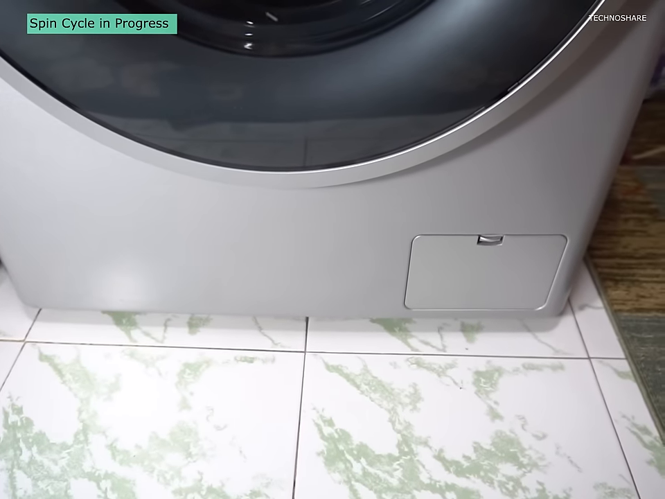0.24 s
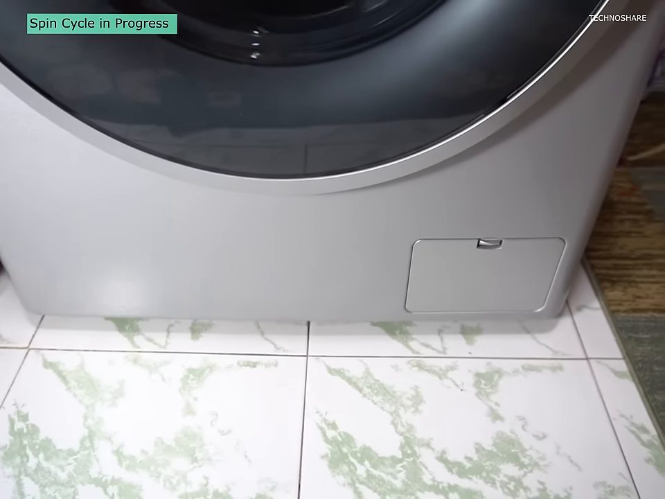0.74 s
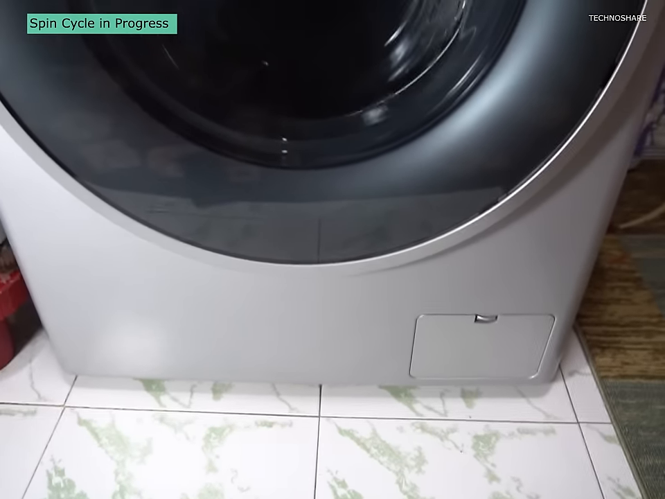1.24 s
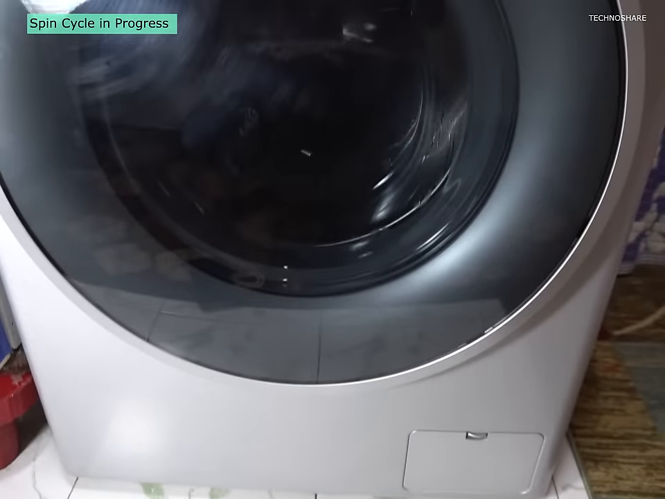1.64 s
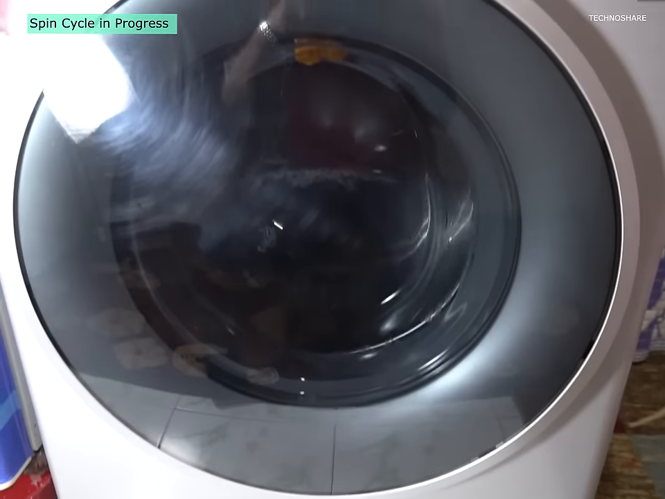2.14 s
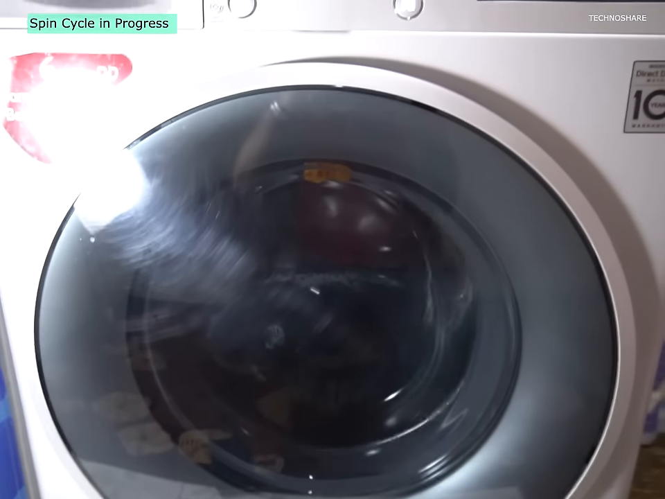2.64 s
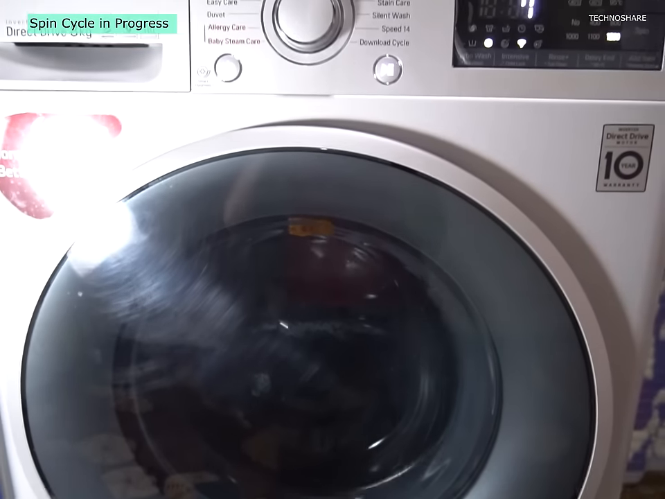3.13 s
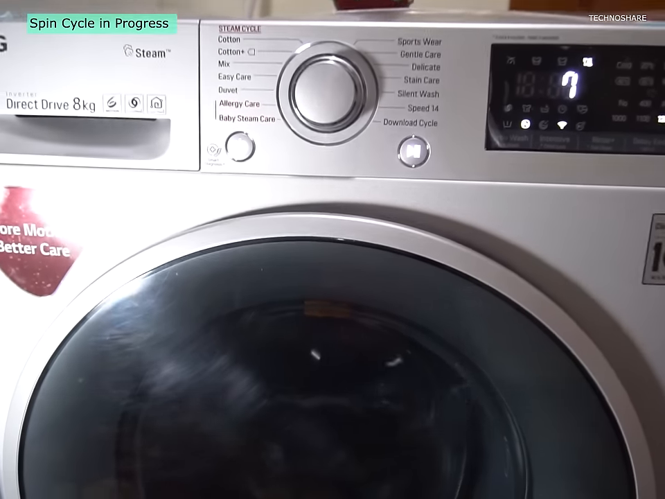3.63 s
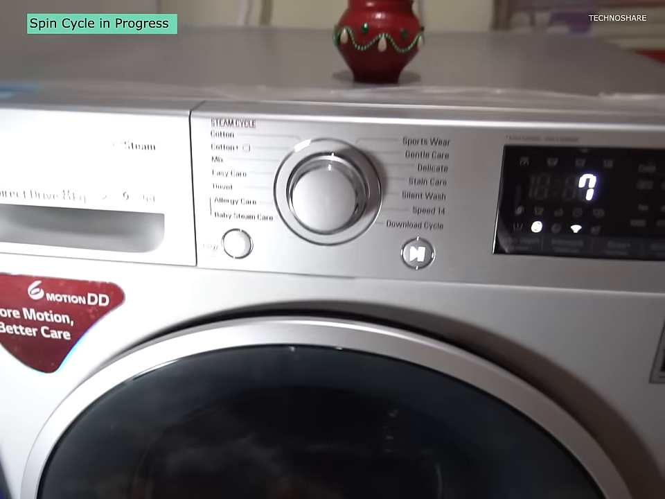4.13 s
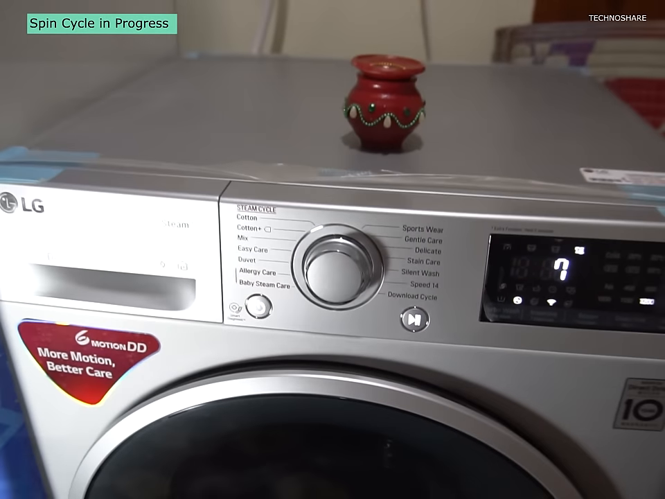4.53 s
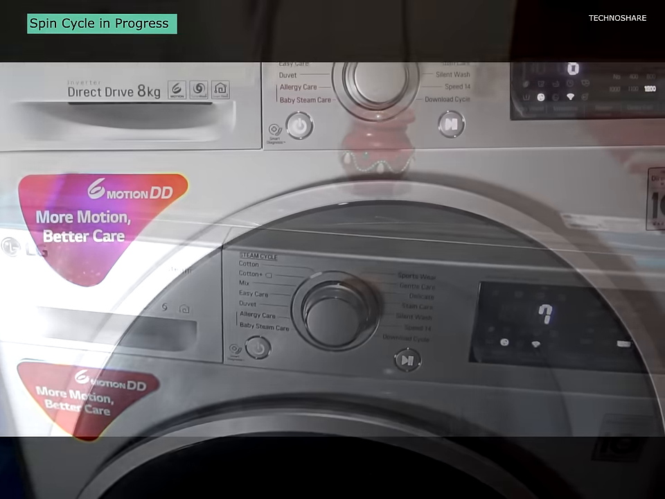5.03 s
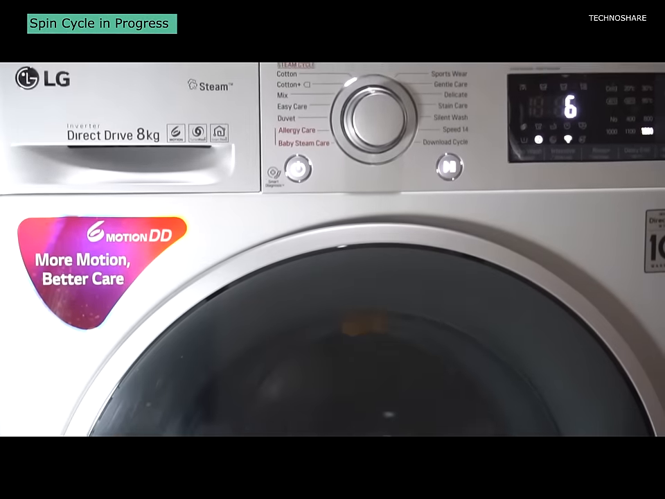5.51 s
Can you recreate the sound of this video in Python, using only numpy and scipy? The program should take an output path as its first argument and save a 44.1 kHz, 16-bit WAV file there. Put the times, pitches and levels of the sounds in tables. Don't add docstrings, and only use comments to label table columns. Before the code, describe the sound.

Steady fluttering drone of a washing machine on spin, with small handling clicks, fading across into a heavier, faster pounding close to the drum.

```python
import sys
import numpy as np
from scipy import signal
from scipy.fft import rfft, irfft
from scipy.io import wavfile
from scipy.ndimage import uniform_filter1d

SR = 44100
rng = np.random.default_rng(int(sys.argv[2]) if len(sys.argv) > 2 else 0)


def bounce(signal):
    frames = np.transpose(np.atleast_2d(signal))
    limited = np.clip(frames, -1, 1)
    pcm = np.round(limited * 32767).astype(np.int16)
    wavfile.write(sys.argv[1], SR, pcm)


def boost_factor(decibels):
    exponent = np.asarray(decibels, float) / 20
    return 10 ** exponent


N = 254456
TIME = np.arange(N) / SR

RISE_S = [.9, 2.3, 3.7]
# order of drum speed, then level/dB rms at floor, door, lid
SLOW_ORDERS = [(1, -33, -37, -37), (2, -35, -36, -36), (3, -26, -25, -23), (4, -48, -54, -53),
               (5, -32, -33, -34), (6, -41, -40, -41), (7, -46, -46, -49), (8, -50, -50, -56),
               (9, -40, -44, -47), (10, -50, -50, -55), (11, -48, -49, -55), (12, -53, -56, -54),
               (14, -48, -50, -53), (15, -57, -52, -57), (17, -57, -61, -54), (18, -65, -60, -60),
               (19, -67, -61, -62), (20, -65, -59, -61), (22, -59, -59, -58), (23, -56, -64, -68),
               (24, -60, -59, -62), (29, -70, -59, -62), (30, -56, -57, -64), (32, -65, -60, -64),
               (36, -55, -65, -67), (37, -58, -59, -65), (42, -60, -61, -72)]
# order, then level/dB rms at floor, door, lid
SLOW_SINGING = [(68, -69, -73, -68), (72, -76, -80, -82), (144, -75, -80, -76)]
# order, then level/dB rms at floor, door, lid
PANELS = [(21, -54, -47.5, -44.5), (27, -45.5, -50.5, -58)]
# t/s, order
DIPS = [
    (.56, 27),
    (1.65, 27),
    (3.55, 27),
    (2.47, 21),
    (2.95, 21),
    (3.23, 21),
    (3.55, 21),
    (3.8, 21),
    (4.03, 21),
]
# order, level/dB rms
FAST_ORDERS = [(1, -16), (2, -17), (3, -27), (4, -34), (5, -30), (6, -44), (7, -39), (8, -49), (9, -39),
               (10, -48), (11, -40), (12, -55), (13, -47), (14, -54), (17, -51), (18, -53), (21, -49),
               (22, -48), (23, -50), (24, -37), (25, -54), (27, -51), (29, -53), (37, -55), (38, -54),
               (39, -53), (42, -55), (96, -60),
               (33, -52.5), (34, -57), (36, -54), (43, -59), (52, -59), (108, -68)]
# start t/s, end t/s, level/dB rms
SLOTS = [
    (.1, 1.77, -77.5),
    (1.9, 3.25, -69.5),
    (3.85, 5.6, -67.5),
]
# f/Hz, level/dB per Hz
SLOW_ROAR = [(10, -78), (30, -71), (75, -72), (140, -73), (260, -71), (450, -75), (700, -83), (1100, -87),
             (1700, -94.5), (2600, -101), (4500, -107), (8000, -105), (12200, -111), (14400, -106),
             (15600, -111)]
# f/Hz, level/dB per Hz
FAST_ROAR = [(10, -76), (30, -66), (140, -65), (220, -68), (350, -67.5), (500, -72.5), (1100, -81),
             (1700, -86), (2600, -92), (4000, -99), (5500, -102.5), (9500, -103.5), (11800, -113),
             (15500, -120)]
# f/Hz, level/dB
TICK_TONE = [(3500, -24), (5500, -3), (7500, -0.5), (10300, 6), (12000, -9), (13500, 0), (15700, -2.5)]
TICK_DB = (-54.5, -55.5, -57.5)
# f/Hz, level/dB rms, wobble a turn/Hz
WHINE = [(14204, -72.5, 8), (14632, -75, 8), (15052, -90, 8)]
# f/Hz, level/dB rms, wobble a turn/Hz
FAST_WHINE = [(13991, -86, 8), (13947, -100, 8), (14566, -99.5, 8), (14633, -96.5, 8)]
# t/s, peak level/dB, f/Hz, width/Hz, t60/s
CLICKS = [
    (0.0273, -35, 5000, 7000, 0.0039),
    (0.599, -48, 1340, 300, 0.13),
    (2.0113, -42.5, 3200, 3500, 0.0085),
    (3.559, -43, 9500, 4000, .012),
    (3.562, -56, 8000, 6000, 0.14),
    (3.578, -56, 9000, 3000, .03),
    (3.613, -56, 7500, 6000, 0.11),
    (4.5384, -40, 2900, 1900, .005),
    (4.541, -48, 3200, 2000, 0.022),
]
# t/s, length/s, f/Hz, glide/Hz, level/dB rms
BIRD = [
    (4.6, .07, 5180, 80, -78),
    (4.72, .12, 5720, -30, -79),
    (4.73, .13, 6750, -20, -73),
]
# f/Hz, correlation/1
SAME = [(60, 0.91), (700, 1), (1400, 0.94), (2100, 0.73), (2800, 0.1), (4000, 0.073), (5500, 0.42),
        (9000, 0.037), (15000, .1)]
# f/Hz, left-right level/dB
LEAN = [(60, -1.6), (200, -1), (700, -.5), (4400, -.2), (8120, 1.8), (15000, 3)]
# f/Hz, left-right level/dB
FAST_LEAN = [(60, -1.9), (200, -1), (700, -.5), (2400, -.3), (8120, -1.3), (15000, -1)]


def shake(turns, orders, levels_db, lead, spread, unsteady_db):
    out = np.zeros(N)
    for order, db in zip(orders, levels_db):
        loose = np.clip((order - 6) / 18, 0, 1)
        slip = 0.06 * loose * np.sqrt(order / 24) * wander(3)
        level_db = db + unsteady_db * loose * wander(4)
        out += boost_factor(level_db) * tone(order * turns + lead + spread * order ** 2 + slip)
    return out


def panel_shake(turns):
    dip_s, dip_db = 0.042, -13
    levels = []
    for order, *levels_db in PANELS:
        dips = sum(dip_db * np.exp(-((TIME - s) / dip_s) ** 2) for s, k in DIPS if k == order)
        levels.append(height(levels_db) + dips)
    return shake(turns, [row[0] for row in PANELS], levels, lead=0, spread=0, unsteady_db=0.7)


def fast_thump(turns):
    orders, levels = np.transpose(FAST_ORDERS)
    flipped = ((orders >= 8) & (orders <= 12)) | ((orders >= 16) & (orders <= 22))
    out = np.zeros(N)
    for part, flip_turns in ((~flipped, 0), (flipped, 0.48)):
        out += shake(turns + 0.358, np.round(orders[part]), levels[part],
                     lead=0.275 + flip_turns, spread=0.0015, unsteady_db=0.5)
    return out


def mains_hum():
    mains_hz = 50.121
    hum = boost_factor(height((-35, -36, -36))) * tone(mains_hz * TIME + 0.135)
    buzz = boost_factor(height((-40.5, -42.5, -46.5))) * tone(2 * mains_hz * TIME + 0.4)
    return hum + buzz


def drain_pump():
    return boost_factor(-48 + 2.5 * wander(2)) * tone(24.8 * TIME + 0.15 * wander(4))


def roar(spectrum, drift, patchy_db):
    frames, hz = N // 512 + 5, np.fft.rfftfreq(2048, 1 / SR)
    a, b, c, d, patches = rng.standard_normal((frames, 1025, 5)).T
    patches = uniform_filter1d(patches, size=8, axis=0)
    patches = evened(uniform_filter1d(patches, size=8, axis=1))
    same = np.clip(read(SAME, hz), -1, 1)[:, None]
    left = a + 1j * b
    right = same * left + np.sqrt(1 - same ** 2) * (c + 1j * d)
    frame_s = np.arange(frames) * 512 / SR
    middle = ((hz >= 300) & (hz < 4500))[:, None]
    treble = (hz >= 4500)[:, None]
    level_db = read(spectrum, hz)[:, None] + patchy_db * patches
    level_db = level_db + middle * drift * height((0, -1, 0), frame_s)
    level_db = level_db + treble * drift * height((-2.5, -3, -1), frame_s)
    z = np.array([left, right]) * boost_factor(level_db)
    return boost_factor(19.5) * signal.istft(z, nperseg=2048, noverlap=1536)[1][:, :N]


def ticks(turns):
    lap = np.floor(turns).astype(int) + 1
    uneven_db = 1.1 * rng.standard_normal(200)[lap]
    since = (turns % 1) / 17.7
    shape = np.exp(-since / 0.00041) + 0.39 * np.exp(-since / 0.0066) + 0.54 * np.exp(-since / 0.026)
    shared, left, right = rng.standard_normal((3, N))
    noise = 0.44 * shared + 1.1 * np.array([left, right])
    burst = evened(coloured(noise, lambda hz: read(TICK_TONE, hz)))
    return boost_factor(height(TICK_DB) + uneven_db) * shape * burst


def whine(lines, turns, jitter_hz):
    out = np.zeros((2, N))
    for hz, db, wobble_hz in lines:
        bend_hz = wobble_hz * (tone(turns) + 1.5 * tone(2 * turns + 0.2))
        beat = np.cumsum(hz + bend_hz + jitter_hz * wander(25)) / SR
        for port, offset in zip(out, (-0.1, 0.1)):
            flutter_db = 3.2 * wander(28) + 2.8 * tone(turns + rng.random())
            port += boost_factor(db + flutter_db) * tone(beat + offset + 0.13 * wander(8))
    return out


def slot_whistle(turns):
    edge_s = 0.2
    level = boost_factor(-80)
    for start, end, db in SLOTS:
        inside = np.minimum(TIME - start, end - TIME) / edge_s + 0.5
        level = level + boost_factor(db) * np.clip(inside, 0, 1)
    return level * boost_factor(1.5 * wander(10)) * tone(120 * turns + 0.08 * wander(18))


def bearing_squeak():
    level_db = np.interp(TIME, [0, 1.8, 2.1], [-85, -83, -100]) + 4 * wander(5)
    return boost_factor(level_db) * tone(4120 * TIME + 0.5 * wander(20))


def clicks():
    out, t = np.zeros((2, N)), np.arange(8192) / SR
    for s, db, hz, width_hz, t60 in CLICKS:
        shared, left, right = rng.standard_normal((3, len(t)))
        noise = shared + 0.6 * np.array([left, right])
        band = coloured(noise, lambda f: -28 * np.log10(1 + ((f - hz) / (width_hz / 2)) ** 2))
        decay = boost_factor(db - 2.5 - 60 * t / t60) * np.minimum(t / 0.00022, 1)
        out[:, round(s * SR):][:, :len(t)] += decay * evened(band)
    return out


def bird():
    out = np.zeros(N)
    for s, length, hz, glide_hz, db in BIRD:
        u = np.clip((TIME - s) / length, 0, 1)
        out += boost_factor(db) * np.sin(np.pi * u) ** 0.5 * tone(np.cumsum(hz + glide_hz * u) / SR)
    return out


def height(levels_db, t=TIME):
    return np.interp(t, RISE_S, levels_db)


def ports(x, lean, left_lead_s):
    hz = np.fft.rfftfreq(N, 1 / SR)
    half = boost_factor(read(lean, hz) / 2) * np.exp(1j * np.pi * hz * left_lead_s)
    return irfft(rfft(x * np.ones((2, 1))) * np.array([half, 1 / half]), N)


def tone(turns):
    return np.sqrt(2) * np.cos(2 * np.pi * turns)


def wander(rate_hz):
    coarse = TIME[::128]
    knots = np.interp(coarse * min(rate_hz, 30) * 2, np.arange(400), rng.standard_normal(400))
    return np.interp(TIME, coarse, evened(uniform_filter1d(knots, size=15)))


def coloured(x, db_at):
    hz = np.fft.rfftfreq(x.shape[-1], 1 / SR)
    return irfft(rfft(x) * boost_factor(db_at(hz)), x.shape[-1])


def evened(x):
    return x / np.sqrt(np.mean(x ** 2) + 1e-20)


def read(points, hz):
    f, value = np.transpose(points)
    return np.interp(np.log(hz + 1), np.log(f + 1), value)


def slow_view():
    drum_hz = 17.52696 + 0.070706 * TIME - 0.000712 * TIME ** 2 - 0.0003786 * TIME ** 3
    turns = np.cumsum(drum_hz) / SR
    rows = SLOW_ORDERS + SLOW_SINGING
    levels = [height(row[1:]) for row in rows]
    body = shake(turns + 0.225, [row[0] for row in rows], levels, lead=-0.383, spread=0.08, unsteady_db=2.5)
    body += panel_shake(turns) + mains_hum() + drain_pump() + slot_whistle(turns)
    air = roar(SLOW_ROAR, drift=1, patchy_db=1.23) + ticks(turns + 0.875)
    machine = ports(body + air + whine(WHINE, turns, jitter_hz=4.5), LEAN, 9e-5)
    return machine + bearing_squeak() + clicks() + bird()


def fast_view():
    turns = 22.115 * TIME
    puff_db = 0.7 + 0.9 * tone(turns - 0.25)
    air = roar(FAST_ROAR, drift=0, patchy_db=1) * boost_factor(puff_db)
    return ports(fast_thump(turns) + air + whine(FAST_WHINE, turns, jitter_hz=4), FAST_LEAN, -5e-5)


def scene():
    start_s, end_s = 4.575, 5.45
    u = np.clip((TIME - start_s) / (end_s - start_s), 0, 1)
    return (1 - u ** 1.55) * slow_view() + u ** 0.48 * fast_view()


def roll_off(x):
    return signal.sosfilt(signal.butter(12, 15760, fs=SR, output="sos"), x)


def record(dry):
    return roll_off(dry)


dry = scene()
out = record(dry)
bounce(out)
```